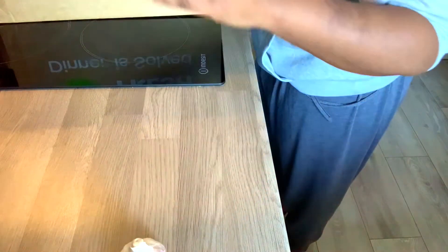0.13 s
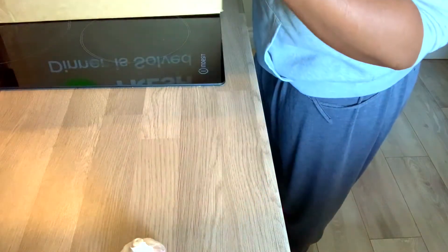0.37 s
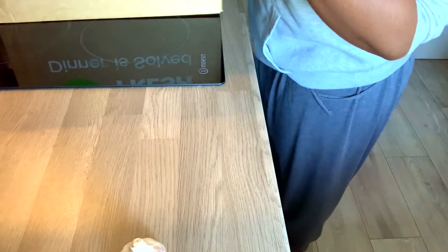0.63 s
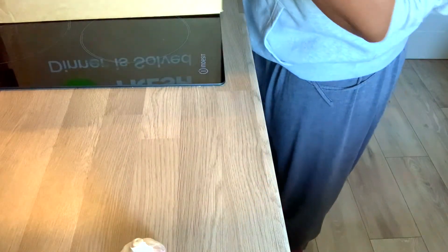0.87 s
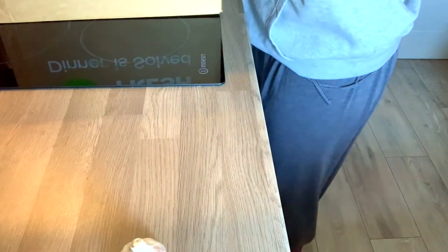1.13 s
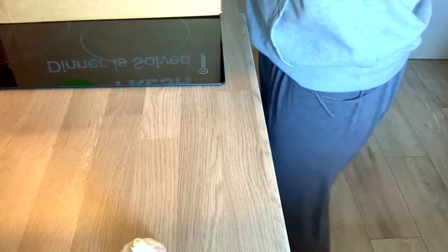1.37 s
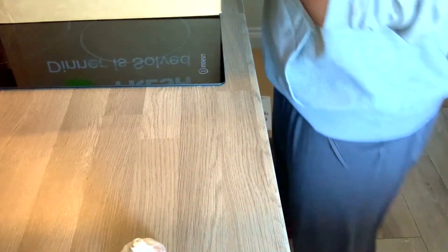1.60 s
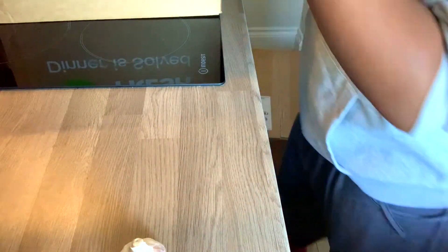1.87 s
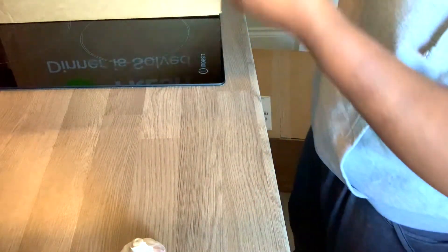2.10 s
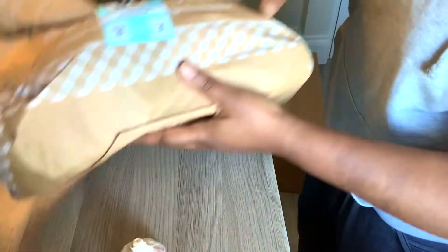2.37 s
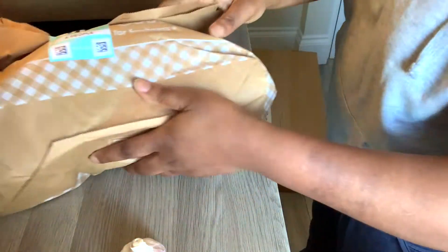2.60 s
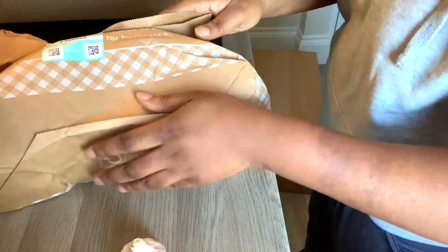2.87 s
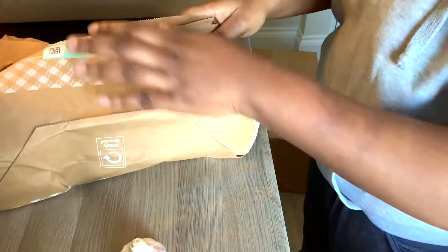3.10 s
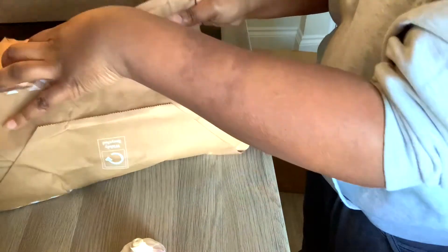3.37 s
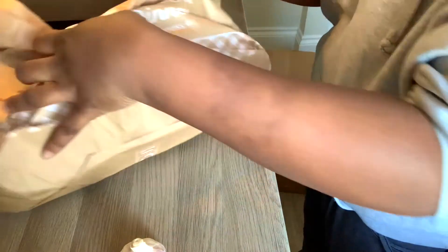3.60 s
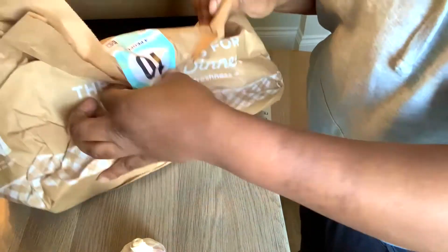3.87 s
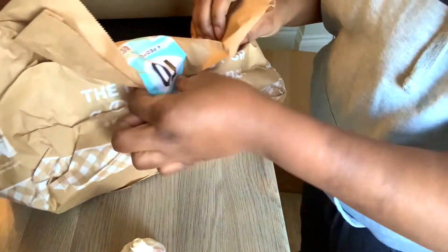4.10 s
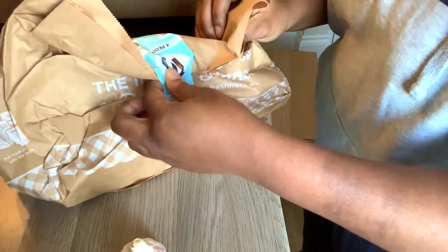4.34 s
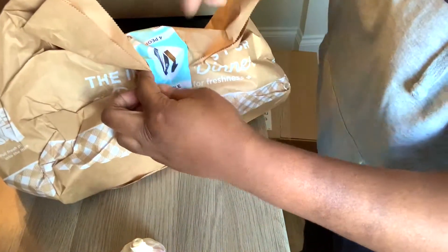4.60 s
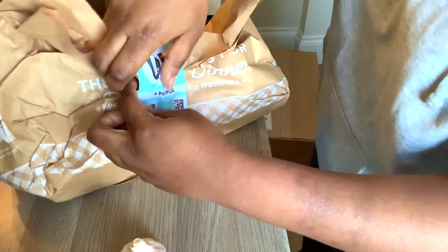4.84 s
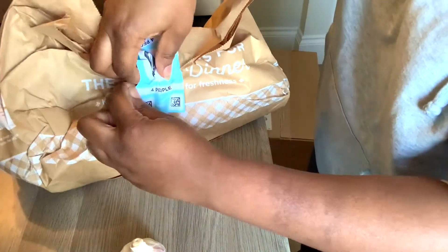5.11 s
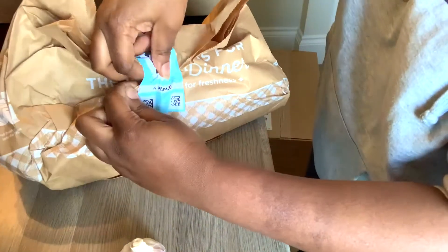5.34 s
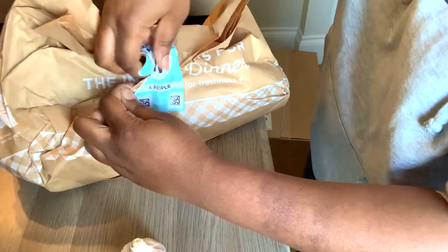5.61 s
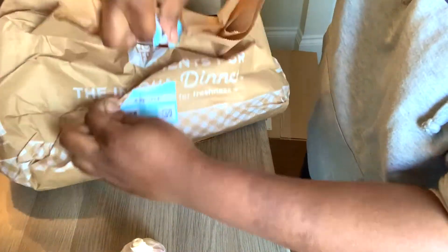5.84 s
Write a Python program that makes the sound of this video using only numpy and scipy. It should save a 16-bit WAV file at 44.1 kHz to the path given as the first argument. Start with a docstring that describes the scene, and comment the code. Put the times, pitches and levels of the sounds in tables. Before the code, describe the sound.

In a small kitchen, hands stir stiff paper quietly inside a box, with faint crackles, a hollow drag and soft bumps. At about two and a half seconds the bag thuds onto a wooden counter, then crinkles loudly as it is turned. Irregular picking and sharp snaps follow to the end. Close stereo microphone, short room echo, faint steady hush.

```python
"""Stiff paper bag on a kitchen counter

In a small kitchen, hands lift a stiff paper bag out of a box, drop it on a wooden counter, turn it and pick at
its label. Shaped noise makes the rustle and the snaps; resonances make the ringing folds, the hollow drag and
the booming wood; short swings make ticks and pops. Sparse echoes give the room, over a steady hush. Two
microphone ports hear the bag; around 9 kHz left and right are nearly alike but out of phase."""
import sys
import numpy as np
from scipy import signal
from scipy.fft import rfft, irfft
from scipy.io import wavfile
from scipy.ndimage import uniform_filter1d

SR = 44100
rng = np.random.default_rng(int(sys.argv[2]) if len(sys.argv) > 2 else 0)


def dump(signal):
    """Clip the signal to [-1, 1] and save it as 16-bit WAV at the path in sys.argv[1]."""
    limited = np.clip(np.atleast_2d(signal).T, -1, 1)
    pcm = np.round(limited * 32767).astype(np.int16)
    wavfile.write(sys.argv[1], SR, pcm)


def linear_from_db(decibels):
    """Turn decibels (scalar or array-like) into linear amplitude factors; 0 gives 1."""
    return 10 ** (np.asarray(decibels, float) / 20)


N = 263277  # samples


def read(points, hz, column=1):
    """Reads one column of a spectrum on a log-frequency axis."""
    table = np.transpose(points)
    return np.interp(np.log(hz + 1), np.log(table[0] + 1), table[column])


def shape(x, gain):
    """Filters by a gain for each frequency bin."""
    return irfft(rfft(x) * gain, N)


def evened(x):
    """Scales to rms 1."""
    return x / np.sqrt(np.mean(x ** 2) + 1e-20)


def drifting(size, count=1):
    """Slow chance of rms 1 that changes every size samples or so."""
    once = uniform_filter1d(rng.standard_normal((count, N)), size)
    return evened(uniform_filter1d(once, size))


def dying(clicks, t60):
    """Lets every click of power die away by 60 dB in t60 seconds."""
    return signal.lfilter([1], [1, -10 ** (-6 / (t60 * SR))], clicks)


# Colour of the kitchen's hush. Each row: frequency in Hz, relative level in dB per Hz.
AIR = [(30, 26), (60, 17), (200, -16), (500, -61), (1500, -29), (5000, -37), (10000, -35), (16000, -8)]
AIR_DB = -56  # rms


def air():
    """The steady hush of the kitchen: shaped noise, unrelated in the two views."""
    hz = np.fft.rfftfreq(N, 1 / SR)
    hush = shape(rng.standard_normal((2, N)), linear_from_db(read(AIR, hz)))
    return linear_from_db(AIR_DB) * evened(hush)


# Effort of the hands on the paper, under the snaps. Each row: time in seconds, relative level in dB.
HANDS = [(0.0, -29.5), (0.07, -46), (0.24, -47), (0.32, -41.5), (0.35, -36), (0.46, -35), (0.51, -40.5),
         (0.63, -44), (0.67, -48.5), (0.8, -52), (0.96, -39), (1.07, -44), (1.15, -46.5), (1.31, -47.5),
         (1.34, -39), (1.372, -38.5), (1.41, -35.5), (1.56, -38), (1.72, -40.5), (1.84, -54), (1.9, -55.5),
         (1.93, -39), (2.05, -39.5), (2.25, -41.5), (2.28, -28.5), (2.39, -26), (2.44, -36), (2.49, -26.5),
         (2.61, -37.5), (2.762, -34.5), (2.9, -41.5), (2.98, -37.5), (3.149, -49.5), (3.258, -39),
         (3.32, -27.5), (3.39, -33.5), (3.59, -27), (3.711, -31.5), (3.961, -30.5), (4.03, -38.5),
         (4.07, -32.5), (4.29, -36), (4.4, -40), (4.522, -29.5), (4.61, -47), (4.72, -50.5), (4.76, -23.5),
         (4.86, -32.5), (4.93, -38.5), (5.03, -41), (5.071, -33), (5.11, -36.5), (5.2, -35.5), (5.271, -22),
         (5.34, -38.5), (5.405, -26), (5.47, -44), (5.55, -60), (5.601, -43), (5.65, -27.5), (5.71, -35.5),
         (5.75, -26.5), (5.79, -35.5), (5.82, -25.5), (5.97, -34.5)]


def effort():
    """Effort of the hands in dB at every sample."""
    return np.interp(np.arange(N) / SR, *np.transpose(HANDS))


# Colour of the rustle as the hands work.
# Each row: time in seconds, level of the low crunch in dB, level of the treble in dB.
COLOUR = [(0, -6, -9), (.3, -6, -17), (.55, -12, -13.5), (.65, -15, -19.5), (.88, -9.5, -15),
          (1.0, -20, -6.5), (1.15, -16, -7.5), (1.25, -8, -14.5), (1.35, -10, -8), (1.45, -19, -18),
          (1.55, -12, -16), (1.63, -5.5, -15), (1.72, -14, -16), (1.88, -11, -6), (1.97, -10.5, -13),
          (2.3, -7, -17), (2.6, -15, -14), (3.0, -10.5, -15), (3.3, -7, -15), (3.7, -10.5, -13),
          (4.1, -6, -15.5), (4.5, -7, -10.5), (4.8, -13, -19), (5.0, -9, -14), (5.25, -9.5, -16),
          (5.5, -21.5, -14), (5.7, -8.5, -17), (5.97, -4.5, -14.5)]


def colour():
    """Level of the low crunch and of the treble in dB at every sample."""
    at, *rows = np.transpose(COLOUR)
    return np.array([np.interp(np.arange(N) / SR, at, row) for row in rows])


# Creases that snap, also played by folds(). Each row: start in seconds, relative peak in dB,
# pitch in Hz at which the fold rings, relative brightness in dB, time in seconds for the noise to die by 60 dB.
SNAPS = [(0.163, -33, 3500, -33, 0.2), (0.267, -30.5, 1060, -17, 0.036), (0.462, -27.5, 1030, -20, 0.17),
         (0.536, -28.5, 1170, -69, 0.16), (0.843, -33, 3320, -32, 0.058), (0.893, -33.5, 3800, -29, 0.075),
         (0.94, -30, 2050, -5.5, 0.053), (0.959, -27.5, 1020, -13, 0.096), (1.021, -31, 3860, -21, 0.044),
         (1.024, -24, 970, -40, 0.13), (1.051, -30, 1000, -30, 0.053), (1.064, -28.5, 3860, -17, 0.22),
         (1.112, -31.5, 700, -23, 0.081), (1.18, -28, 1600, -28, 0.032), (1.195, -28, 1010, -25, 0.046),
         (1.237, -30, 1960, -16, 0.11), (1.335, -28, 2230, -16, 0.062), (1.41, -31, 2140, -10, 0.071),
         (1.442, -28, 990, -24, .05), (1.74, -31, 2050, -32, 0.035), (1.554, -22.5, 5330, -15, 0.036),
         (1.607, -29, 790, -41, 0.067), (1.995, -25.5, 2680, -18, 0.053), (2.114, -23.5, 3400, -18, 0.049),
         (2.254, -21, 950, -35, 0.047), (2.267, -11, 1210, -12, 0.033), (2.297, -18, 2200, -12, 0.13),
         (2.343, -16.5, 1200, -11.5, 0.046), (2.386, -20.5, 1050, -18, 0.037),
         (2.477, -10.5, 980, -16, 0.057), (2.546, -22.5, 673, -1, 0.014), (2.636, -19.5, 2000, -24, 0.064),
         (2.656, -17, 2080, -15.5, 0.069), (2.717, -24, 1060, -16, 0.1), (2.75, -7, 4850, -14, 0.011),
         (2.85, -23, 1350, -19, 0.046), (2.941, -20.5, 1390, -18, 0.068), (2.982, -17, 835, -30, 0.03),
         (3.025, -16.5, 1340, -13.5, 0.011), (3.294, -23.5, 1590, -43, 0.21), (3.311, -42, 1560, 6, 0.021),
         (3.336, -22.5, 670, -16, 0.17), (3.401, -13, 3280, -17, 0.024), (3.454, -18, 1600, -18, 0.046),
         (3.501, -27, 2500, -12, 0.035), (3.562, -25, 1230, -30, 0.044), (3.578, -22.5, 706, -35, 0.094),
         (3.596, -25, 1530, -6.5, 0.049), (3.663, -10.5, 1060, -20, 0.024), (3.731, -17, 1020, -22, 0.029),
         (3.736, -17, 1400, -13, 0.11), (3.779, -19.5, 730, -19, 0.053), (3.808, -18, 3150, -5, 0.022),
         (3.834, -21, 1940, -27, 0.043), (3.951, -11.5, 2380, -22, 0.013), (3.975, -21, 1750, -16, 0.021),
         (4.043, -22, 1620, -51, 0.089), (4.062, -27, 4000, -8, 0.076), (4.069, -19, 5700, -8.5, 0.063),
         (4.077, -28, 4540, -12, 0.023), (4.09, -25, 4000, -19, 0.015), (4.108, -18, 1590, -31, 0.019),
         (4.15, -8, 2130, -10, 0.02), (4.168, -13, 1015, -12.5, 0.045), (4.223, -12, 3660, -13.5, 0.014),
         (4.249, -17.5, 1540, -16.5, 0.034), (4.306, -18, 4470, -8.5, 0.032),
         (4.333, -17.5, 2420, -33, 0.025), (4.356, -22, 3480, -9, 0.016), (4.384, -21, 1150, -48, 0.046),
         (4.396, -20, 1560, -42, 0.06), (4.416, -16.5, 2820, -24, 0.031), (4.636, -30.5, 3460, -18, 0.033),
         (4.682, -28, 1380, -61, 0.027), (4.741, -32, 1470, -18, 0.094), (4.76, -29, 2870, -17, 0.052),
         (4.774, -24, 690, -2.5, 0.21), (4.846, -12, 1700, -19, 0.034), (4.862, -21.5, 2290, -15, 0.066),
         (4.871, -11.5, 3020, -18, 0.031), (4.916, -25, 1870, -11, 0.043), (4.925, -15, 1500, -13, 0.03),
         (4.943, -20, 905, -42, 0.038), (4.975, -18.5, 3480, -15.5, 0.017), (5.054, -14, 1096, -18, 0.045),
         (5.065, -23, 4500, -13, 0.021), (5.074, -20, 4040, -14, 0.027), (5.134, -25, 1490, -17, .03),
         (5.162, -20.5, 1040, -32, 0.038), (5.178, -20, 1790, -14, 0.025), (5.205, -15.5, 1210, -18, 0.012),
         (5.224, -22, 1510, -25, 0.033), (5.244, -19, 2340, -19, 0.088), (5.259, -7.5, 1620, -25, 0.033),
         (5.313, -18.5, 1730, -19, 0.065), (5.375, -7, 4900, -10, 0.024), (5.444, -22, 1460, -23, 0.045),
         (5.494, -24.5, 2350, -31, 0.041), (5.507, -22, 4330, -27, 0.025), (5.563, -32.5, 2100, -33, 0.031),
         (5.646, -30, 1150, -13, 0.12), (5.728, -10, 1450, -14, 0.0094), (5.744, -18.5, 1520, -40, 0.038),
         (5.8, -20.5, 1920, -9, 0.12), (5.827, -8.5, 700, -40, 0.057), (5.896, -12.5, 1200, -56, 0.026),
         (5.904, -12.5, 1580, -38, 0.037)]
SNAP_FULL_DB, FULL_DB_PER_OCTAVE = -9.5, -1  # crunch of a 1 kHz fold; larger, lower folds carry more


def snap_power(low, high, crease_db):
    """Power of all snaps in one band: a fast rise, then a decay that a sharp tick leads in the treble."""
    power = np.zeros(N)
    for (at, peak_db, fold_hz, bright_db, t60), own_db in zip(SNAPS, crease_db):
        full_db = SNAP_FULL_DB + FULL_DB_PER_OCTAVE * np.log2(fold_hz / 1e3)
        part = power[round(at * SR):][:6000]
        u = np.arange(len(part)) / SR
        fall_db = (0.29 + 5.4 * high) * np.exp(-u / 0.004) - 60 * u / t60
        level_db = peak_db - 5.0 + low * full_db + high * bright_db + 0.27 * own_db
        rise = np.minimum(u / 0.00035, 1)
        part += (linear_from_db(level_db + fall_db) * rise) ** 2
    return power


# Basic colour of the paper, one band a row. Each row: centre in Hz, relative level in dB.
PAPER = [(350, -7.5), (550, -4.5), (850, -6), (1300, -9), (2000, -10), (3000, -8), (4500, -6.5),
         (6500, -0.5), (9500, 7), (13000, 1), (16000, 1)]
WANDER_DB = -0.5  # how far the colour of the rustle wanders


def paper(crackles_per_s=260, spread_db=5.5, scatter_db=6.0, crackle_t60=0.077, crackle_db=-3.0,
          rub_db=-6.0, clump_db=6, patchy_db=3.5):
    """Snaps, crackles and rubbing set the power of noise in bands; each crease has its own colour."""
    hz = np.fft.rfftfreq(N, 1 / SR)
    effort_db = effort()
    full_db, bright_db = colour() + WANDER_DB * drifting(size=2000, count=2)
    centres = np.transpose(PAPER)[0]
    low = np.interp(np.log(centres), np.log([800, 1600]), [1, 0])  # share of crunch in each band
    high = np.interp(np.log(centres), np.log([4000, 10000]), [0, 1])  # share of treble
    # crackles come in clumps, around a median rate
    chance = crackles_per_s / SR * linear_from_db(clump_db * drifting(size=900)[0])
    small = rng.random(N) < chance
    size_db = spread_db * np.minimum(rng.exponential(1, N), 3)
    patch_db = patchy_db * drifting(size=1200, count=len(PAPER))  # the rubbed area changes colour
    crease_db = scatter_db * rng.standard_normal((len(SNAPS), len(PAPER)))
    place = np.interp(np.log(hz + 1), np.log(centres), np.arange(len(PAPER)))
    out = np.zeros((2, N))
    for k, (_, colour_db) in enumerate(PAPER):
        clicks = small * linear_from_db(size_db + scatter_db * rng.standard_normal(N)) ** 2
        crackle = dying(clicks, crackle_t60)
        power = linear_from_db(rub_db + patch_db[k]) ** 2 + linear_from_db(crackle_db) ** 2 * crackle / crackle.mean()
        power *= linear_from_db(effort_db + low[k] * full_db + high[k] * bright_db) ** 2
        power += snap_power(low[k], high[k], crease_db[:, k])
        # neighbouring bands overlap; bass below 300 Hz is cut
        band = np.cos(np.pi / 2 * np.clip(place - k, -1, 1)) * np.clip(hz / 300, 0, 1) ** 2
        noise = evened(shape(rng.standard_normal((2, N)), band))
        out += linear_from_db(colour_db) * shape(noise * np.sqrt(power), np.sqrt(band))
    return out


def ringing_folds(ring_db, sharpness):
    """Each snapping fold is a small panel: a noise burst through a resonance at its own pitch."""
    out, u = np.zeros((2, N)), np.arange(3000) / SR
    for at, peak_db, hz, _, t60 in SNAPS:
        burst = rng.standard_normal((2, len(u)))
        r = np.exp(-np.pi * hz * (hz / 1e3) ** .5 / sharpness / SR)  # higher folds are more damped
        rung = signal.lfilter([1, 0, -1], [1, -2 * r * np.cos(2 * np.pi * hz / SR), r * r], burst)
        rise = np.minimum(u * hz / 2, 1)  # over two cycles
        fall_db = -60 * u / (0.59 * t60)  # the ring dies sooner than the noise
        sound = evened(rung) * rise * linear_from_db(peak_db + ring_db + fall_db)
        part = out[:, round(at * SR):][:, :len(u)]
        part += sound[:, :part.shape[1]]
    return out


def folds(ring_db=-3, sharpness=11, grains_per_s=500, spread_db=3, grain_db=-7):
    """Snapping folds ring, over a bed of tiny folds that each ring for a few cycles at one of 24 pitches."""
    u = np.arange(3000) / SR
    grains = np.zeros((2, N))
    pitches = np.geomspace(600, 5000, num=24)
    crunch_db = colour()[0]
    sizes = (rng.random(N) < grains_per_s / SR) * linear_from_db(spread_db * np.minimum(rng.exponential(1, N), 4))
    kind = rng.integers(len(pitches), size=N)
    for k, hz in enumerate(pitches):
        phase = 2 * np.pi * (hz * u + rng.random((2, 1)))
        ring = np.sin(phase) * np.minimum(u * hz, 1) * np.exp(-np.pi * hz / 9 * u)
        grain = evened(ring) * (1e3 / hz) ** 0.29
        # low grains follow the crunch
        follow = np.interp(np.log(hz), np.log([800, 1600]), [.6, 0])
        clicks = sizes * (kind == k) * linear_from_db(crunch_db * follow)
        grains += signal.oaconvolve(clicks[None], grain, axes=1)[:, :N]
    return ringing_folds(ring_db, sharpness) + evened(grains) * linear_from_db(grain_db + effort())


# The weight of the bag shifts on the wood. Each row: start in seconds, relative level in dB.
SHIFTS = [(0.17, -45), (0.264, -36.5), (0.331, -45), (.42, -42), (.535, -63), (.62, -69), (.72, -48),
          (0.775, -51.5), (.83, -50), (.9, -63), (1.02, -43.5), (1.13, -69), (1.38, -47), (1.541, -53),
          (1.67, -70), (1.78, -73), (1.949, -41.5), (2.28, -34), (2.465, -18.5), (2.749, -35.5),
          (3.283, -32.5), (3.45, -33), (3.61, -35), (3.739, -31.5), (3.97, -40), (4.139, -36.5),
          (4.5, -41.5), (4.741, -33), (4.775, -47), (5.25, -62), (5.41, -77), (5.66, -39), (5.824, -33)]
SHIFT_RISE_S, SHIFT_T60_S = 0.0075, 0.38
WEIGHT_DB, WEIGHT_FOLLOWS = -54.5, 0.75  # level at an effort of -40 dB, dB per dB of effort


def weight():
    """Pressure on the wood: a share of the effort, and a swell that dies after each shift."""
    t = np.arange(N) / SR
    power = linear_from_db(WEIGHT_DB + WEIGHT_FOLLOWS * (effort() + 40)) ** 2
    for at, db in SHIFTS:
        u = np.maximum(t - at, 0)
        swell = np.minimum(u / SHIFT_RISE_S, 1) * linear_from_db(db - 60 * u / SHIFT_T60_S)
        power = power + swell ** 2
    return np.sqrt(power)


def pushes(rows):
    """Force on the wood: one smooth hump a row."""
    force = np.zeros(N)
    for at, db, length in rows:
        push = np.hanning(max(round(length * SR), 8))
        force[round(at * SR):][:len(push)] += linear_from_db(db) * push / push.sum()
    return force[None]


# The bag lands or is pressed on the counter.
# Each row: start in seconds, relative level in dB, length of the blow in seconds.
BLOWS = [(.536, -38.5, 0.00098), (.775, -47, 0.0036), (.81, -53, .003), (1.385, -41, 0.0014),
         (1.545, -33, 0.0062), (1.61, -39, 0.0013), (2.27, -38, 0.0021), (2.473, -18, 0.0023),
         (2.478, -9.5, 0.0014), (2.485, -11.5, 0.0016), (2.488, -12.5, 0.0013), (2.495, -26.5, 0.0022),
         (2.505, -32, 0.0042), (2.532, -31, 0.0021), (2.548, -22, 0.0013), (2.585, -23.5, 0.0023),
         (2.65, -27.5, 0.0029), (3.46, -31.5, 0.0019), (3.51, -30, 0.0023), (4.777, -26.5, 0.0023),
         (4.787, -43, 0.0069), (4.796, -27, 0.0032), (4.878, -31, 0.0039), (5.259, -34.5, 0.0017),
         (5.376, -35, 0.003), (5.828, -26, 0.0011), (5.836, -31, 0.0015)]
# Softer, slower bumps against box and counter.
# Each row: start in seconds, relative level in dB, length of the push in seconds.
BUMPS = [(0.197, -30.5, 0.0083), (1.139, -15.5, 0.018), (1.68, -19.5, 0.017), (1.697, -24, 0.017),
         (1.795, -25, 0.017), (1.85, -32, 0.016), (1.951, -23, 0.014), (2.328, -14, 0.02),
         (3.359, -33, 0.022), (3.469, -35, 0.0072), (3.759, -30, 0.021), (3.979, -25.5, 0.0079),
         (4.539, -11, 0.024), (4.791, -8, 0.022), (5.425, -18.5, 0.017), (5.441, -22, 0.018),
         (5.84, -10, 0.014), (5.856, -13, 0.011)]
BUMP_T60_S = .3  # whatever leans on the wood damps it further
# Modes of the worktop. Each row: frequency in Hz, level in dB, time in seconds to die by 60 dB.
COUNTER = [(58.6, -21, 0.25), (101, -14, 0.35), (126.3, -13, 0.1), (160, -11, .1), (186, -5, 0.16),
           (213, -9, 0.09), (250, -8, 0.08), (284, -1, 0.11), (327, -10, .1), (385, -11, .08),
           (420, -9, 0.13), (514, -6, 0.09), (575, -5, 0.12), (655, -4, 0.09), (730, -5, 0.06),
           (815, -4, .055), (960, -4, .05)]
# Colour of the shifting weight, before the wood rings. Each row: frequency in Hz, relative level in dB per Hz.
RUMBLE = [(35, -25), (57, 1), (78, -3), (110, -6.5), (200, -4), (290, -8.5), (450, -21), (900, -11.5)]


def counter():
    """Blows and bumps ring the modes of the worktop; shifting weight keeps it rumbling."""
    u, hz = np.arange(SR // 2) / SR, np.fft.rfftfreq(N, 1 / SR)
    modes = sum(linear_from_db(db - 60 * u / t60) * np.exp(2j * np.pi * (f * u - 1 / 8)) for f, db, t60 in COUNTER)
    views = np.array([modes.real, modes.imag])  # each mode a quarter swing later in the second view
    damped = views * linear_from_db(-60 * u / BUMP_T60_S)
    boom = signal.fftconvolve(pushes(BLOWS), views, axes=1)[:, :N]
    boom += signal.fftconvolve(pushes(BUMPS), damped, axes=1)[:, :N]
    drive = shape(rng.standard_normal((2, N)), linear_from_db(read(RUMBLE, hz)))
    drive /= np.std(signal.fftconvolve(drive, views[:1], axes=1))
    drive *= weight() * linear_from_db(3 * drifting(size=1500)[0])  # in uneven lumps
    return boom + signal.fftconvolve(drive, views[:1], axes=1)[:, :N]


# How long the kitchen rings. Each row: frequency in Hz, time in seconds to die by 60 dB.
KITCHEN = [(100, 0.79), (400, 0.32), (1500, 0.18), (5000, 0.13), (15000, 0.14)]
ROOM_BASS_HZ = 350  # the small kitchen returns little below this


def kitchen(x):
    """Sparse echoes of random sign, each band dying at its own speed."""
    taps = np.zeros((2, SR // 2))
    slots = np.arange(200, SR // 2 - 20, 20)  # one echo in every 20 samples
    at = slots + rng.integers(0, 20, (2, len(slots)))
    np.put_along_axis(taps, at, rng.choice([-1., 1.], at.shape), 1)
    hz, t, z = signal.stft(taps, SR, nperseg=256)
    hz = hz[:, None]
    fade = linear_from_db(-60 * t / read(KITCHEN, hz))
    bass_cut = 1 / (1 + (ROOM_BASS_HZ / (hz + 1)) ** 2)
    tail = signal.istft(z * fade * bass_cut, SR, nperseg=256)[1]
    return signal.fftconvolve(x, tail / np.linalg.norm(tail[0]), axes=1)[:, :N]


# Dry ticks, where a crease breaks at once.
# Each row: start in seconds, peak in dB before TICK_DB is added, centre in Hz.
TICKS = [(0.842, -24, 2300), (0.893, -29, 2380), (0.961, -23, 1120), (1.023, -20.5, 1030),
         (1.061, -23, 4330), (2.255, -19, 940), (2.276, -9.5, 1200), (2.297, -11, 1500),
         (2.656, -14.5, 1300), (2.943, -16, 1500), (3.4, -18, 2000), (3.474, -13, 1720),
         (3.664, -10.5, 1370), (3.806, -21, 3120), (3.949, -10, 2480), (4.071, -22, 4910),
         (4.149, -9, 2170), (4.221, -9.5, 3500), (4.354, -26, 3500), (4.385, -12.5, 1140),
         (4.842, -20, 1610), (4.87, -14, 2680), (4.976, -25, 3150), (5.054, -11.5, 1220),
         (5.259, -20, 1920), (5.374, -2, 5230), (5.729, -12.5, 1570), (5.799, -13, 1460), (5.828, -3, 747),
         (5.829, -4, 1500), (5.902, -6, 1560)]
TICK_CYCLES, TICK_DB = 0.99, -5  # cycles to die by a factor e, level added to all ticks


def ticks():
    """Each tick is a broad swing at its own pitch that dies within a few cycles."""
    out, u = np.zeros(N), np.arange(400) / SR
    for at, db, hz in TICKS:
        swing = np.sin(2 * np.pi * hz * u) * np.exp(-(u * hz - .25) / TICK_CYCLES)
        out[round(at * SR):][:400] += linear_from_db(db + TICK_DB) * swing
    return out


# The bag drags along the box wall and its hollow sounds.
# Each row: time in seconds, centre in Hz, level in dB before DRAG_DB is added.
DRAG = [(1.319, 1070, -60), (1.334, 1110, -34.5), (1.367, 1080, -57), (1.398, 955, -33), (1.559, 1290, -49),
        (1.636, 902, -44), (1.724, 1230, -39), (1.8, 1510, -66)]
DRAG_WIDTH_HZ, DRAG_DB = 440, -3.5


def drag():
    """Rubbing noise through one resonance that moves as the bag changes shape."""
    at, hz, db = np.transpose(DRAG)
    t = np.arange(N) / SR
    # noise around 0 Hz is turned up to the moving centre
    r = np.exp(-np.pi * DRAG_WIDTH_HZ / SR)
    rub = signal.lfilter([1], [1, -r], rng.standard_normal((2, N)))
    turn = np.exp(2j * np.pi * np.cumsum(np.interp(t, at, hz)) / SR)
    hollow = evened((turn * rub).real)
    fade = np.clip(np.minimum(t - at[0], at[-1] - t) / 0.014, 0, 1)
    return hollow * fade * linear_from_db(DRAG_DB + np.interp(t, at, db))


# A wall of the bag pops in or out, its high tones arriving first. Each row: start in seconds, level in dB.
POPS = [(2.475, -11), (3.66, -32), (3.947, -32.5), (4.386, -30), (5.261, -18.5), (5.38, -32), (5.647, -31),
        (5.674, -48), (5.73, -28), (5.827, -16)]
POP_TOP_HZ, POP_LOW_HZ, POP_FALL_S, POP_T60_S = 700, 130, .003, .045


def pops():
    """Each pop is a short dying swing whose pitch drops fast."""
    u, out = np.arange(4000) / SR, np.zeros(N)
    hz = POP_LOW_HZ + (POP_TOP_HZ - POP_LOW_HZ) * np.exp(-u / POP_FALL_S)
    swing = np.sin(2 * np.pi * np.cumsum(hz) / SR) * linear_from_db(-60 * u / POP_T60_S)
    for at, db in POPS:
        part = out[round(at * SR):][:len(u)]
        part += linear_from_db(db) * swing[:len(part)]
    return out


KITCHEN_DB = -7.5


def scene():
    """Two views of the same events, with the room behind them; ticks and pops are alike in both."""
    near = paper() + folds() + counter() + ticks() + drag() + pops()
    return near + linear_from_db(KITCHEN_DB) * kitchen(near) + air()


def roll_off(x):
    """The treble ends steeply here."""
    return signal.sosfilt(signal.butter(12, 16990, fs=SR, output="sos"), x)


# The pair of microphone ports. Each row: frequency in Hz, likeness from 0 to 1,
# phase in radians by which left leads, left over right in dB.
PORTS = [(60, .95, 0, -.5), (130, .85, 0, 2), (280, .6, .2, -1.2), (700, .2, 1.6, -1), (1200, .65, .4, -1),
         (2700, .3, 0, -2.7), (5300, .25, 1, -1.5), (6900, .7, 2.1, -.4), (7900, .9, 2.6, -.4),
         (8400, .999, 3.1, 0), (9500, .999, 3.18, 0), (10000, .95, 3.64, -.4), (12000, .88, 5.2, 0),
         (13200, .99, 6.2, 0), (14800, .99, 6.33, 0), (15700, .85, 6.8, 0)]
EDGE_HZ = 15950  # the treble falls from here


def record(dry):
    """The right port hears the left port's sound late in phase plus a share of its own; then the band limit."""
    hz = np.fft.rfftfreq(N, 1 / SR)
    same = np.clip(read(PORTS, hz, column=1), 0, 1)
    lead, balance_db = read(PORTS, hz, column=2), read(PORTS, hz, column=3)
    left, own = rfft(dry)
    right = same * np.exp(-1j * lead) * left + np.sqrt(1 - same ** 2) * own
    pair = np.array([left * linear_from_db(balance_db / 2), right / linear_from_db(balance_db / 2)])
    edge = linear_from_db(-np.clip((hz - EDGE_HZ) / 8, 0, 25) - np.clip((hz - 16900) / 4, 0, 60))
    edge *= 1 / (1 + (46 / (hz + 1)) ** 6)  # the microphone drops the deepest bass
    return roll_off(irfft(pair * edge, N))


dry = scene()
out = record(dry)
dump(out)
```